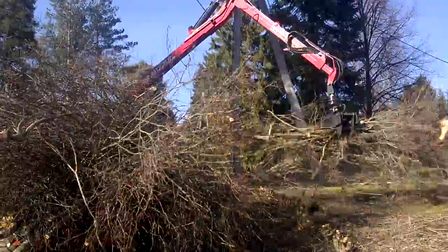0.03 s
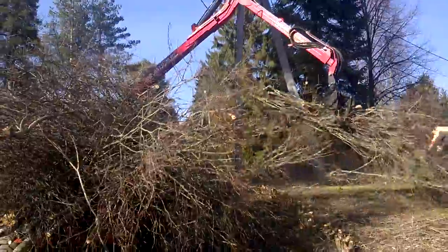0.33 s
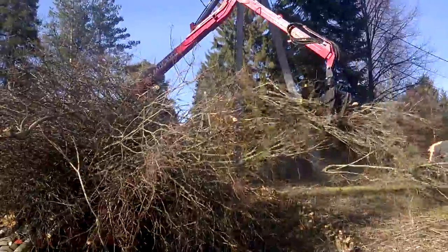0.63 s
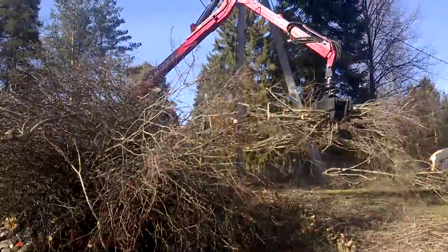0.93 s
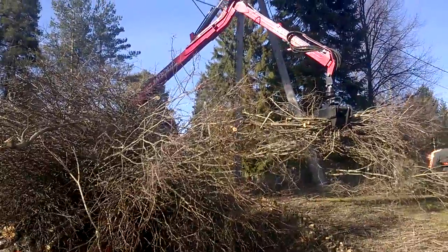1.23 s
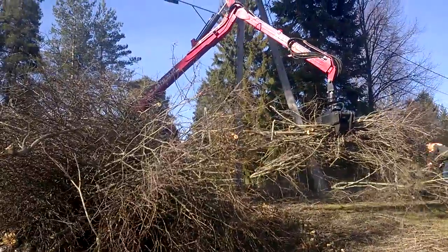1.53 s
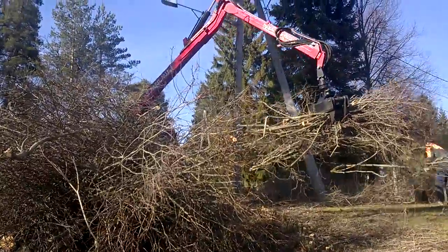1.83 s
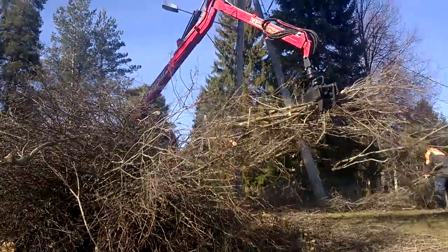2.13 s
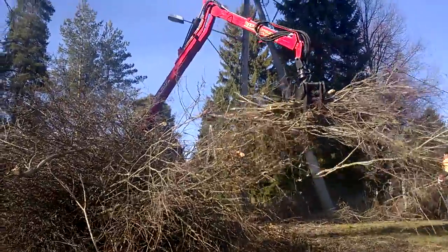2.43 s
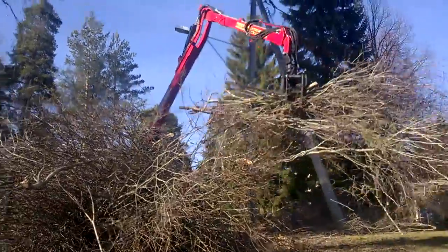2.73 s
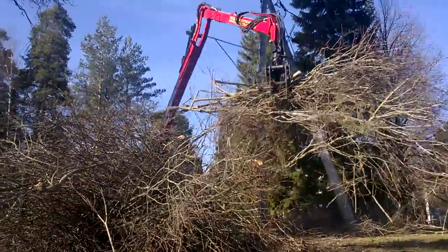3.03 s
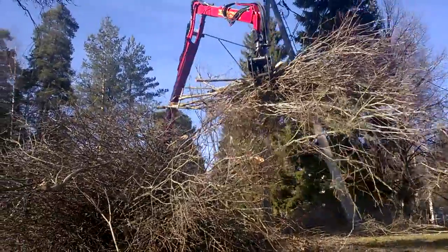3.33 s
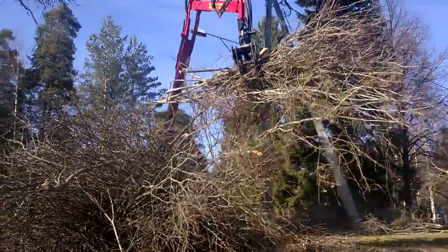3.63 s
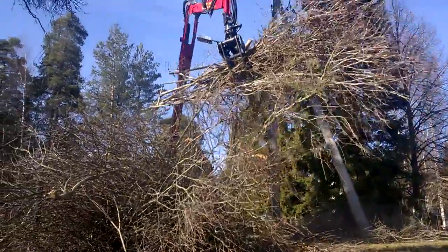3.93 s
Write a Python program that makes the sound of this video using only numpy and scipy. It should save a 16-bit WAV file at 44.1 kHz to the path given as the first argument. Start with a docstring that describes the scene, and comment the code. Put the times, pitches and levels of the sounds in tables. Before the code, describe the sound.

Dry branches being lifted from a pile rustle, snap and knock, quieten briefly, then crackle again with sharper cracks. The crane's diesel engine rumbles and clatters at a constant speed, and nearby trees give the snaps a short echo.

```python
"""A diesel crane throbs and clatters at a steady speed as its grapple lifts cut branches off a brush pile.
Exhaust pulses make the low note, and the block and panels rattle in time with the firings.
Dragged twigs rustle with countless tiny contacts, thin ones snap as their fibres tear, and thick
limbs knock and rub. The trees at the edge of the wood give the snaps, knocks and rubs a short echo."""
import sys
import numpy as np
from scipy import signal
from scipy.fft import rfft, irfft
from scipy.io import wavfile

SR = 44100
rng = np.random.default_rng(int(sys.argv[2]) if len(sys.argv) > 2 else 0)


def dump(signal):
    """Clip the signal to [-1, 1] and save it as 16-bit WAV at the path in sys.argv[1]."""
    limited = np.clip(np.atleast_2d(signal).T, -1, 1)
    pcm = np.round(limited * 32767).astype(np.int16)
    wavfile.write(sys.argv[1], SR, pcm)


N = 176400
T = np.arange(N) / SR

# engine speed: (time [s], cycle rate [Hz])
ENGINE_SPEED = [(0.05, 23.29), (1.2, 23.7), (1.8, 23.4), (4.0, 23.58)]
# exhaust envelope: (time [s], firing note level [dB], level of the other harmonics [dB])
EXHAUST_LEVEL = [(.05, -38.5, -40), (.35, -42, -40), (1.15, -36, -41), (1.6, -41, -42), (2.85, -42.5, -42),
                 (3.3, -39.5, -38.5), (4, -38.5, -41.5)]
# exhaust timbre: (multiple of the cycle rate, offset from the envelope [dB])
EXHAUST_HARMONICS = [(1, -6), (2, -25), (3, -0.5), (4, -7.5), (5, -11), (6, -5), (7, -19.5)]
# envelope of the low rumble: (time [s], level [dB])
RUMBLE_ENVELOPE = [(0, -43.5), (2, -44), (3.6, -43)]
# tone of the low rumble: (frequency [Hz], relative level [dB])
RUMBLE_SPECTRUM = [(20, 9), (35, 1.5), (60, 6), (100, 2), (155, 2.5), (200, -4), (270, -5.5), (360, -23.5),
                   (600, -19)]
# tone of the block's clatter: (frequency [Hz], relative level [dB])
CLATTER_SPECTRUM = [(200, -10), (350, -3), (470, 1), (640, 2.5), (820, -4.5), (1100, -1.5), (1280, -7),
                    (1550, -4.5), (1900, -14), (2800, -18), (5000, -27.5), (9000, -36), (15000, -61)]
# ringing engine panels: (frequency [Hz], bandwidth [Hz], level [dB])
PANEL_MODES = [(543, 8.8, -61.5), (1018, 64, -56.5), (1433, 25, -63), (2380, 55, -70), (2660, 25, -92)]
# rustle envelope before the trims: (time [s], stem level [dB], twig level [dB])
RUSTLE_ENVELOPE = [(.05, -48, -50), (.18, -46, -47.5), (.28, -46, -47), (.36, -41, -41), (.47, -47, -48),
                   (.65, -51, -56.5), (.76, -48, -53.5), (.84, -51.5, -55.5), (1.1, -53, -56),
                   (1.24, -54, -56), (1.38, -61, -85), (1.75, -60.5, -79), (1.84, -60, -59),
                   (1.95, -60.5, -94), (2.42, -64.5, -69.5), (2.55, -51.5, -58), (2.72, -52.5, -58.5),
                   (2.91, -55, -62), (2.95, -53.5, -53), (3.05, -48.5, -51), (3.19, -60, -66.5),
                   (3.34, -55, -58), (3.5, -57, -63.5), (3.66, -56.5, -56.5), (3.78, -55, -52),
                   (3.9, -56, -59.5), (4, -50.5, -60)]
# midrange body of dragged stems: (frequency [Hz], relative level [dB])
STEM_SPECTRUM = [(700, 0.5), (1500, 0.5), (2500, 0.5), (5000, 1.5), (6500, -5), (9000, -7.5)]
# treble sizzle of fine twigs: (frequency [Hz], relative level [dB])
TWIG_SPECTRUM = [(4000, -15), (6000, 2.5), (7500, 1.5), (11000, 1), (15500, -2.5)]
# breaking twigs: (time [s], crack level [dB], centre [Hz], t60 [s], splinter level [dB])
TWIG_SNAPS = [(.069, -37.5, 5000, 0.12, -38), (.607, -30.5, 2680, 0.053, -55),
              (.716, -33.5, 7200, 0.016, -46), (1.235, -33.5, 3930, 0.017, -43),
              (1.3293, -34, 2420, 0.037, -59), (2.142, -43.5, 5000, 0.017, -68),
              (2.289, -39.5, 4620, .031, -60), (2.327, -40.5, 3603, 0.03, -57),
              (2.4755, -36, 5300, 0.014, -39), (2.837, -40, 4003, .037, -44),
              (2.9282, -24.5, 4800, 0.016, -45), (3.017, -32, 2465, 0.025, -49),
              (3.041, -31.5, 4900, 0.02, -40), (3.268, -40.5, 6000, 0.028, -47),
              (3.326, -43, 6500, 0.045, -37.5), (3.459, -34.5, 5000, 0.016, -50),
              (3.55, -42, 7000, .019, -37), (3.7245, -39, 5450, .03, -36), (3.755, -35, 5000, 0.12, -38.5),
              (3.767, -27, 2600, 0.037, -34.5), (3.817, -49, 7000, 0.035, -36),
              (3.971, -35.5, 3900, .025, -39)]
# thick limbs striking: (time [s], level before the limb's filter [dB], filter centre [Hz])
LIMB_KNOCKS = [(.144, -26.5, 1420), (.549, -25.5, 1010), (.596, -23.5, 462), (.607, -24, 610),
               (.611, -20, 1040), (1.3295, -27.5, 677.4), (1.345, -30, 1110), (2.294, -30, 900),
               (3.13, -31.5, 467), (3.767, -24, 220)]
# ring of a limb: (frequency [Hz], relative level [dB], t60 [s])
LIMB_MODES = [(207, 8, 0.036), (407, -6, 0.082), (507, 0.5, 0.11), (704, -22, 0.027), (832, 1.5, 0.034),
              (1013.5, 2, 0.066), (1120, -3.5, 0.041), (1382, -4.5, 0.062)]
# limbs rubbing on each other: (time [s], level [dB], pitch [Hz], length [s])
LIMB_RUBS = [(1.652, -52.5, 1090, 0.11), (2.354, -46.5, 1050, 0.07), (3.399, -47, 1050, 0.068)]

CYCLE_THROB_DB, FIRING_THROB_DB, PANEL_THROB_DB, THROB_LAG_S = 2, 1.0, 1, 0.011
WAVER_DB, PIPE_SMEAR_RAD, CLATTER_DB = 0.53, 0.892, -46.5
STEM_TRIM_DB, TWIG_TRIM_DB, JERK_DB = -2, -2.5, 1.5
GRAINS_PER_S, GRAIN_SPREAD_DB, GRAIN_CYCLES, GRAIN_SHARE = 1100, 2, 13.5, 0.45
FIBRES_PER_S, SPLINTER_HZ = 8300, 12300
TICKS_PER_S, TICK_DB, TICK_SPREAD_DB, TICK_LOW_HZ, TICK_HIGH_HZ = 40, -54, 0.5, 6000, 15000
KNOCK_ATTACK_S, CRUNCH_DB, CRUNCH_T60_S = 0.0015, -4, 0.098
RUB_SLIPS_PER_S, RUB_WIDTH_HZ = 600, 144
ECHO_DB, ECHO_T60_S, ECHO_HZ = -11, 0.22, 5000


def from_db(db):
    """Decibels to gain."""
    return 10 ** (np.asarray(db) / 20)


def rms_one(x):
    """Scale to unit rms."""
    return x / np.sqrt(np.mean(x ** 2) + 1e-20)


def envelopes(rows):
    """One curve at every sample for each column after the time."""
    times, *columns = np.transpose(rows)
    return [np.interp(T, times, column) for column in columns]


def drift(rate_hz):
    """Smooth random modulation with a spread of 1."""
    pole = np.exp(-80 * np.pi * rate_hz / SR)  # runs at one step per 40 samples
    slow = signal.lfilter([1], [1, -2 * pole, pole * pole], rng.standard_normal(N // 40 + 2002))[2000:]
    return np.interp(np.arange(N) / 40, np.arange(len(slow)), rms_one(slow))


def coloured(x, spectrum):
    """EQ to a spectrum, falling 20 dB an octave beyond its ends; unit rms."""
    hz = np.arange(1, N // 2 + 2) * SR / N
    points_hz, points_db = np.transpose(spectrum)
    octaves_outside = np.abs(np.log2(hz / np.clip(hz, points_hz[0], points_hz[-1])))
    eq_db = np.interp(np.log(hz), np.log(points_hz), points_db) - 20 * octaves_outside
    return rms_one(irfft(rfft(x) * from_db(eq_db), N))


def resonance(x, hz, width_hz):
    """Resonant band-pass with unity gain at its peak."""
    r, w = np.exp(-np.pi * width_hz / SR), 2 * np.pi * hz / SR
    zeros = np.array([1, 0, -1]) * (1 - r * r) / 2
    return signal.lfilter(zeros, [1, -2 * r * np.cos(w), r * r], x + 1e-18)


def low_pass(x, hz):
    """Gentle low-pass."""
    return signal.sosfilt(signal.butter(2, hz, fs=SR, output="sos"), x)


def add(out, start_s, sound):
    """Mix a sound in at its cue."""
    i = int(start_s * SR)
    out[i:i + len(sound)] += sound[:N - i]


def decay(t, t60):
    """Exponential tail, 60 dB down at t60."""
    return np.exp(-np.log(1000) * t / t60)


def wood_burst(envelope, clicks_per_s, hz, width_hz):
    """Random clicks ring a wood resonance; the burst takes the envelope's shape and energy."""
    clicks = rng.standard_normal(len(envelope)) * (rng.random(len(envelope)) < clicks_per_s / SR)
    burst = resonance(resonance(clicks, hz, width_hz), hz, 2 * width_hz) * envelope
    return burst * np.linalg.norm(envelope) / np.linalg.norm(burst)


def engine():
    """Exhaust harmonics over a rumble; block and panels throb with each cycle and its three firings."""
    (cycle_hz,), (rumble_db,) = envelopes(ENGINE_SPEED), envelopes(RUMBLE_ENVELOPE)
    firing_db, others_db = envelopes(EXHAUST_LEVEL)
    phase = 2 * np.pi * np.cumsum(cycle_hz) / SR
    exhaust = 0
    for multiple, db in EXHAUST_HARMONICS:
        level_db = db + (firing_db if multiple == 3 else others_db) + WAVER_DB * drift(6.0)
        smear = PIPE_SMEAR_RAD * multiple ** 2  # the pipe spreads each pulse
        exhaust += np.sqrt(2) * from_db(level_db) * np.sin(multiple * phase - smear)
    cycle = phase - 2 * np.pi * cycle_hz * THROB_LAG_S
    throb = rms_one(from_db(CYCLE_THROB_DB * np.cos(cycle) + FIRING_THROB_DB * np.cos(3 * cycle)))
    clatter = from_db(CLATTER_DB) * coloured(rng.standard_normal(N), CLATTER_SPECTRUM) * throb
    panel_throb = throb * from_db(PANEL_THROB_DB * np.cos(cycle))
    for hz, width_hz, db in PANEL_MODES:
        clatter += from_db(db) * rms_one(resonance(rng.standard_normal(N) * panel_throb, hz, width_hz))
    rumble = from_db(rumble_db) * coloured(rng.standard_normal(N), RUMBLE_SPECTRUM)
    return exhaust + clatter + rumble


def crackle(spectrum, level_db):
    """Countless twig contacts, each ringing a few cycles, over the hiss of sliding bark."""
    density = from_db(.6 * (level_db - level_db.mean()))  # grains crowd as the rustle grows
    sizes = from_db(GRAIN_SPREAD_DB * np.minimum(rng.exponential(1, N), 5.5)) / np.sqrt(density)
    clicks = sizes * (rng.random(N) < GRAINS_PER_S * density / SR)
    grains = 0
    for hz in np.geomspace(900, 15500, 24):
        touched = rng.standard_normal(N) * (rng.random(N) < .3)
        grains += resonance(clicks * touched, hz, np.log(1000) / np.pi * hz / GRAIN_CYCLES)
    hiss = rms_one(rng.standard_normal(N))
    mix = np.sqrt(GRAIN_SHARE) * rms_one(grains) + np.sqrt(1 - GRAIN_SHARE) * hiss
    return from_db(level_db) * coloured(mix, spectrum)


def rustle():
    """Stems and fine twigs drag through the pile in small jerks."""
    stem_db, twig_db = envelopes(RUSTLE_ENVELOPE)
    jerks = from_db(JERK_DB * drift(17))
    stems = crackle(STEM_SPECTRUM, STEM_TRIM_DB + stem_db)
    twigs = crackle(TWIG_SPECTRUM, TWIG_TRIM_DB + twig_db)
    return jerks * (stems + twigs)


def snap(db, hz, t60, relative_width=0.41):
    """One break: a dying burst of tearing fibres rings the twig."""
    fade = decay(T[:SR // 10], t60)
    return from_db(db) / 2 * wood_burst(fade, FIBRES_PER_S, hz, relative_width * hz)


def twig_ticks():
    """The finest twigs break at random, harder while the rustle is strong."""
    out = np.zeros(N)
    _, twig_db = envelopes(RUSTLE_ENVELOPE)
    effort_db = 0.48 * (twig_db - twig_db.mean())
    for when, size, pitch in rng.random((int(TICKS_PER_S * N / SR), 3)):
        db = TICK_DB + effort_db[int(when * N)] - TICK_SPREAD_DB * np.log(max(size, .05))
        hz = TICK_LOW_HZ * (TICK_HIGH_HZ / TICK_LOW_HZ) ** pitch
        add(out, when * N / SR, snap(db, hz, t60=0.013))
    return out


def twig_snaps():
    """The loudest breaks: a dry crack and a bright spray of splinters."""
    out = np.zeros(N)
    for start_s, crack_db, hz, t60, splinter_db in TWIG_SNAPS:
        crack = snap(crack_db, hz, t60)
        splinters = snap(splinter_db, SPLINTER_HZ, t60, relative_width=0.96)
        add(out, start_s, crack + splinters)
    return out


def tree_echo(x):
    """Dull scatter off the ground and trees, after a 6 ms pre-delay."""
    t = T[:SR // 2]
    scatter = low_pass(rng.standard_normal(len(t)), ECHO_HZ) * decay(t, ECHO_T60_S) * (t > .006)
    return signal.fftconvolve(x, scatter / np.linalg.norm(scatter))[:N]


def limb_knocks():
    """Limbs strike: wood modes, varied on every hit, and a crunch of bark, coloured by the limb's size."""
    out, t = np.zeros(N), T[:SR // 2]
    attack = np.minimum(t / KNOCK_ATTACK_S, 1)  # a short fade-in softens the start of each blow
    for start_s, db, centre_hz in LIMB_KNOCKS:
        ring = 0
        for hz, mode_db, t60 in LIMB_MODES:
            strength = from_db(mode_db + rng.normal(0, 1)) * rng.choice([-1, 1])
            detuned_hz = hz * rng.normal(1, 0.015)
            ring += strength * np.sin(2 * np.pi * detuned_hz * t) * decay(t, t60)
        crunch = rms_one(low_pass(rng.standard_normal(len(t)), 2500)) * decay(t, CRUNCH_T60_S)
        blow = (ring + from_db(CRUNCH_DB) * crunch) * attack
        add(out, start_s, from_db(db) / 2 * resonance(blow, centre_hz, width_hz=0.58 * centre_hz))
    return out


def limb_rubs():
    """Bark sticks and slips in a short swell that sets the limb ringing."""
    out, t = np.zeros(N), T[:SR // 5]
    for start_s, db, hz, length_s in LIMB_RUBS:
        swell = np.sin(np.pi * np.minimum(t / length_s, 1))
        add(out, start_s, from_db(db) * wood_burst(swell, RUB_SLIPS_PER_S, hz, RUB_WIDTH_HZ))
    return out


def scene():
    """Mono mix: wood hits and their echo over a dry bed of rustle and engine."""
    bed = rustle() + engine()
    wood = limb_knocks() + limb_rubs() + twig_snaps() + twig_ticks()
    return (wood + from_db(ECHO_DB) * tree_echo(wood) + bed)[None]


def record(dry, start_s=.038, fade_s=.006, cutoff_hz=15850):
    """A quick fade-in after a moment of silence, and a steep high cut."""
    fade_in = np.clip((T - start_s) / fade_s, 0, 1)
    return signal.sosfilt(signal.ellip(12, .1, 80, cutoff_hz, fs=SR, output="sos"), dry * fade_in)


dry = scene()
out = record(dry)
dump(out)
```